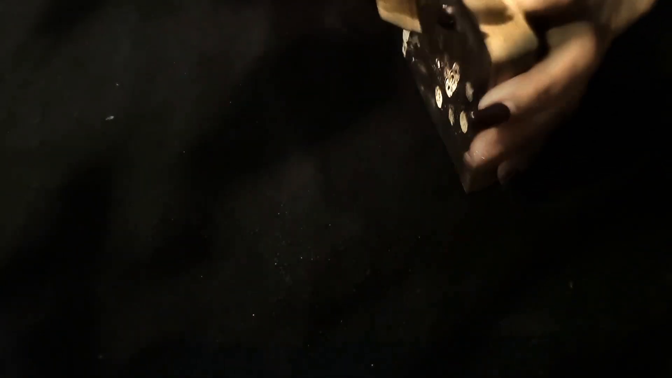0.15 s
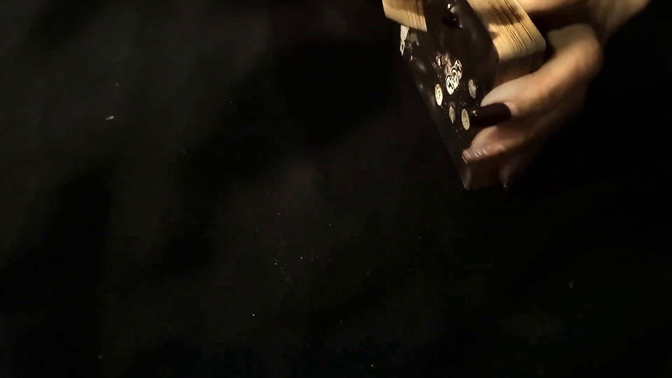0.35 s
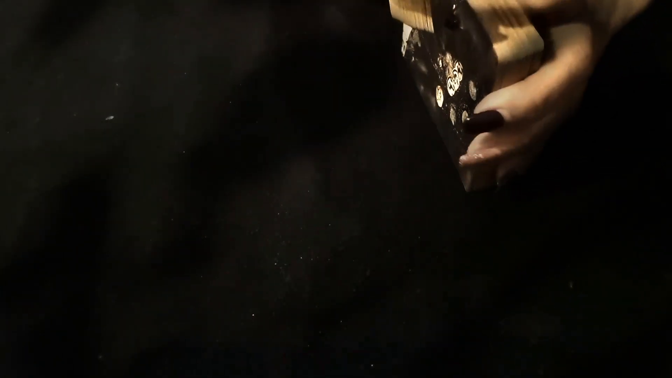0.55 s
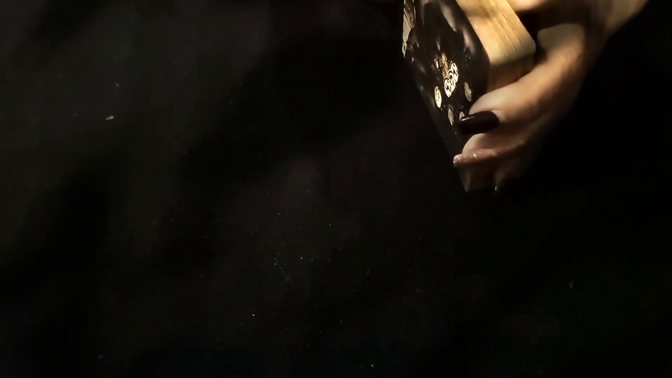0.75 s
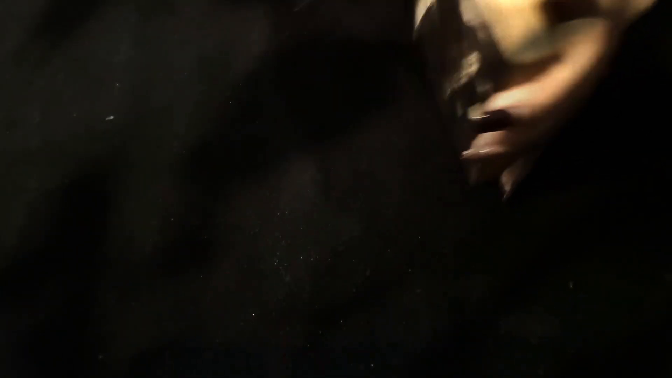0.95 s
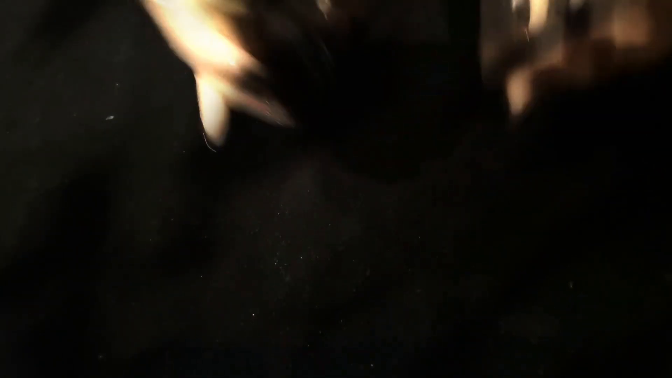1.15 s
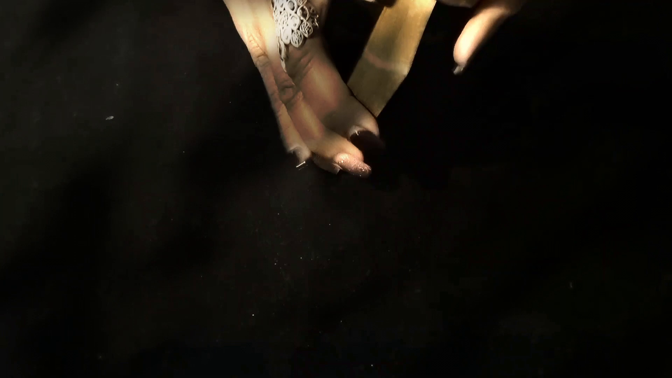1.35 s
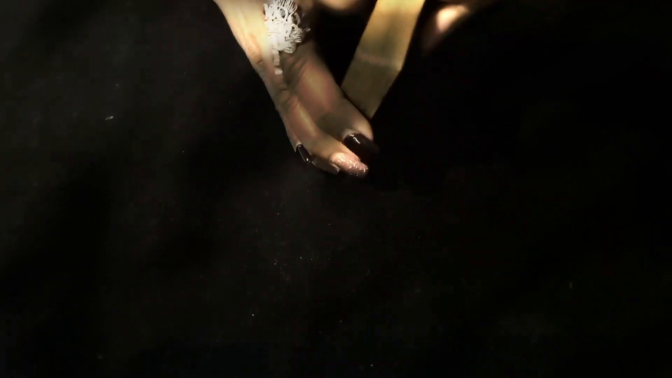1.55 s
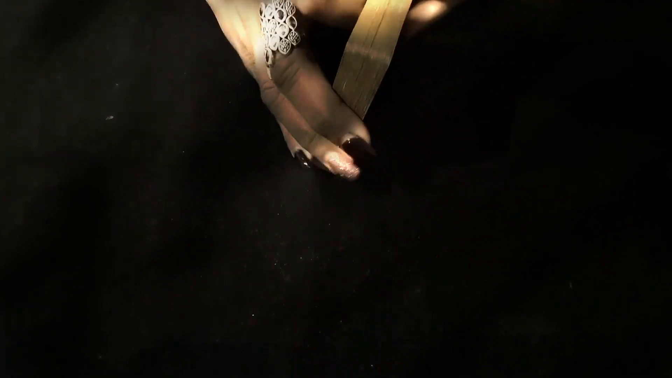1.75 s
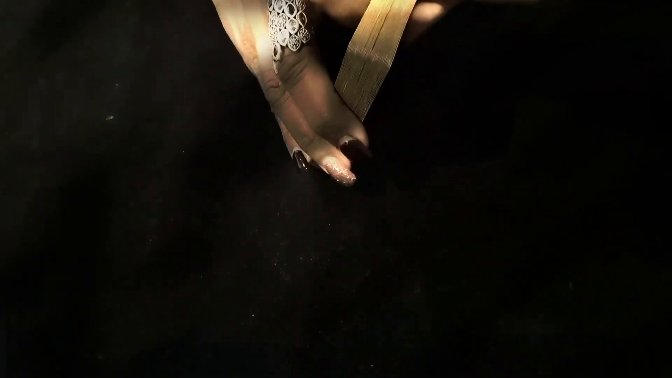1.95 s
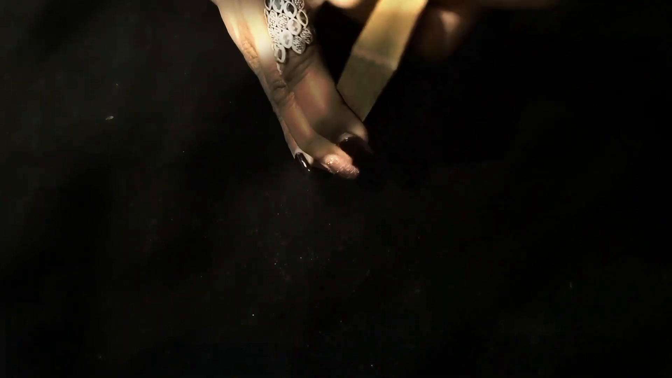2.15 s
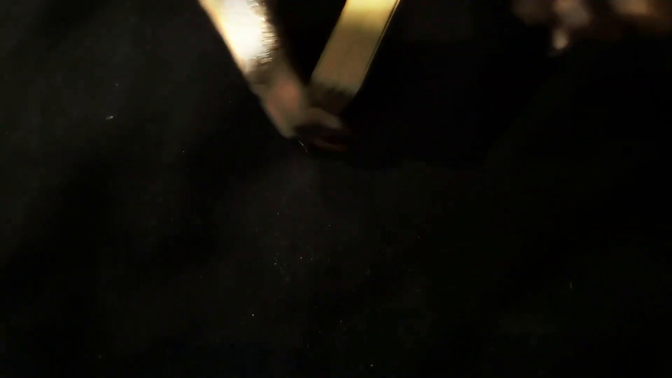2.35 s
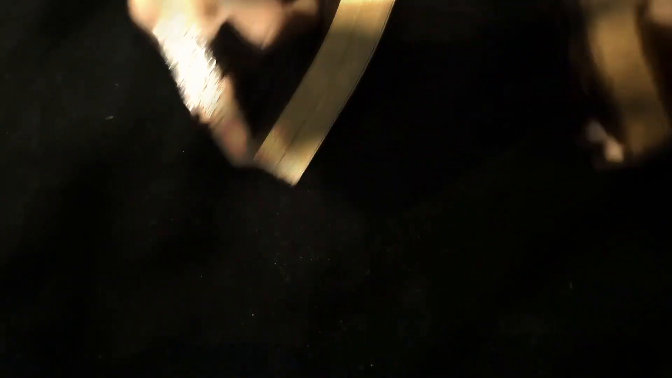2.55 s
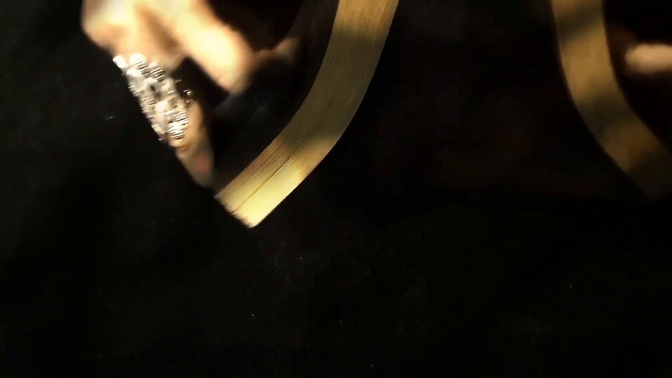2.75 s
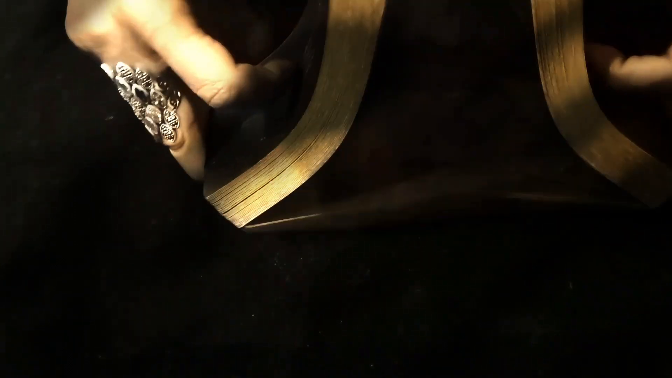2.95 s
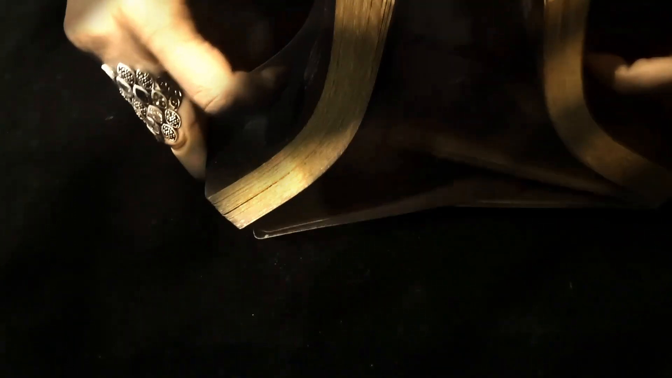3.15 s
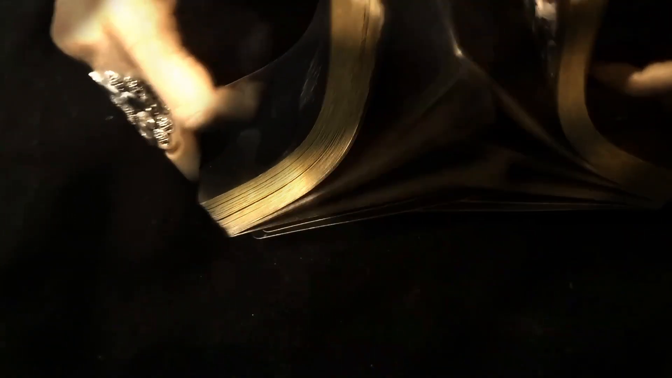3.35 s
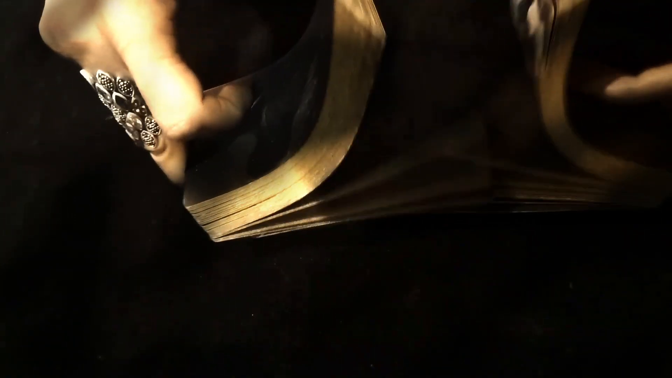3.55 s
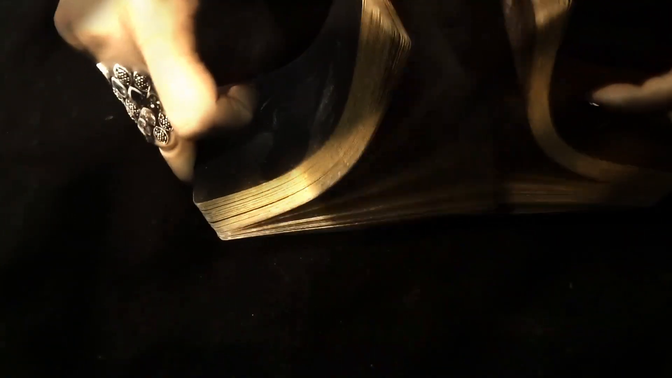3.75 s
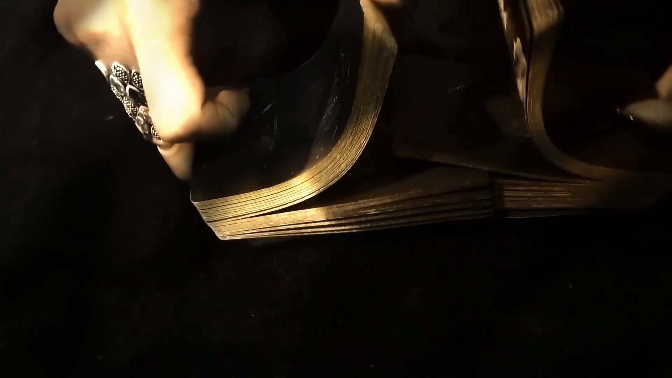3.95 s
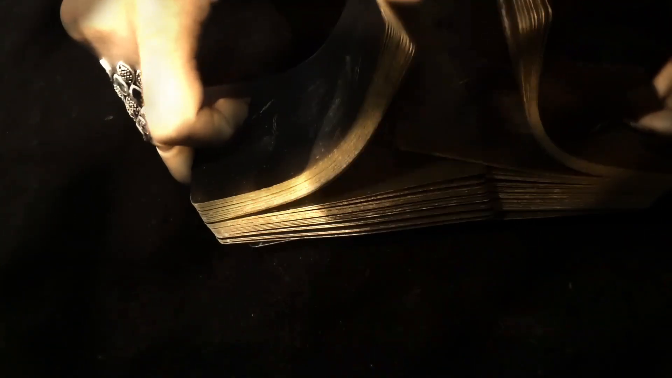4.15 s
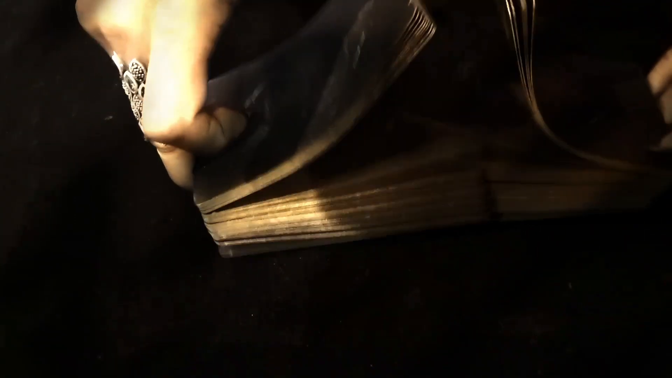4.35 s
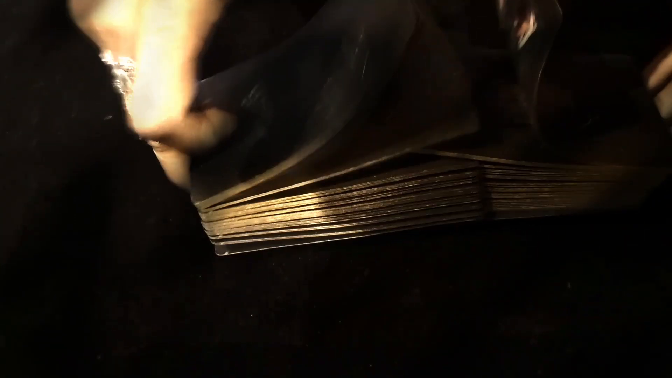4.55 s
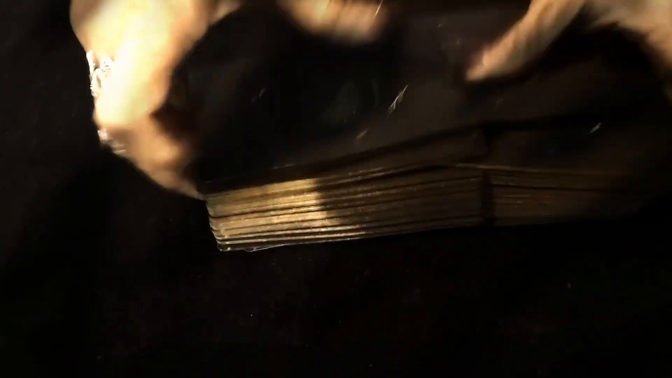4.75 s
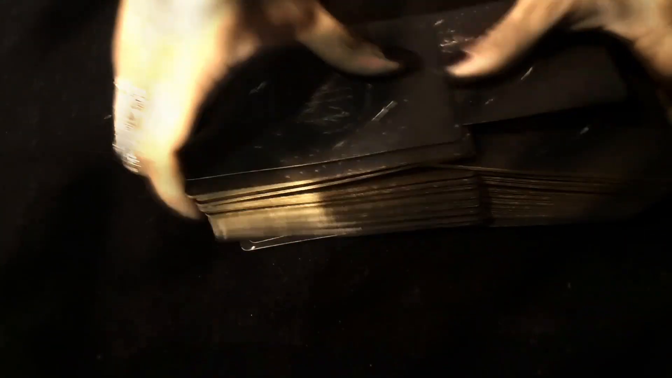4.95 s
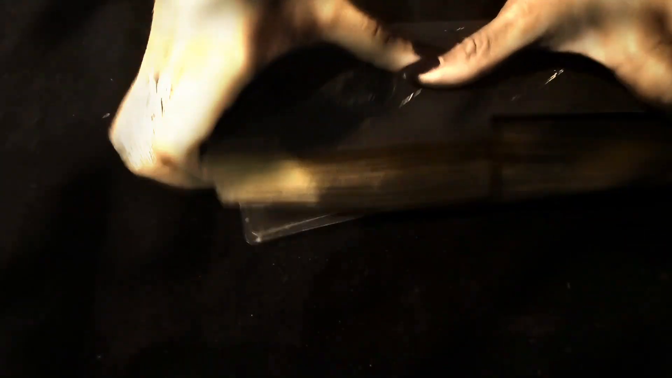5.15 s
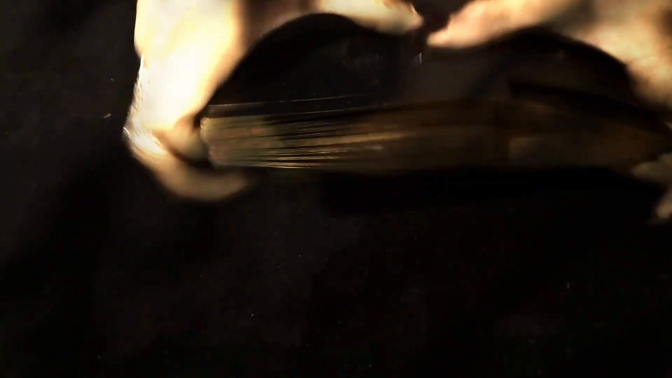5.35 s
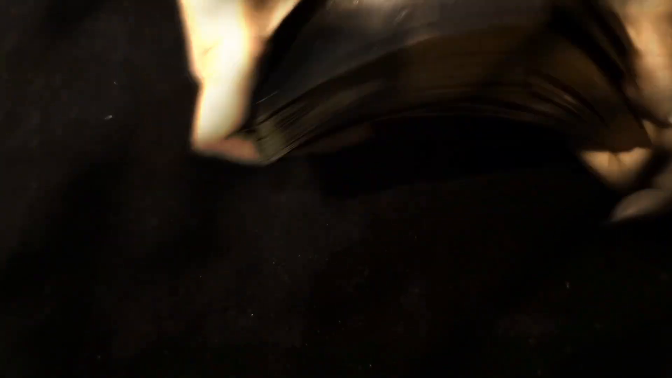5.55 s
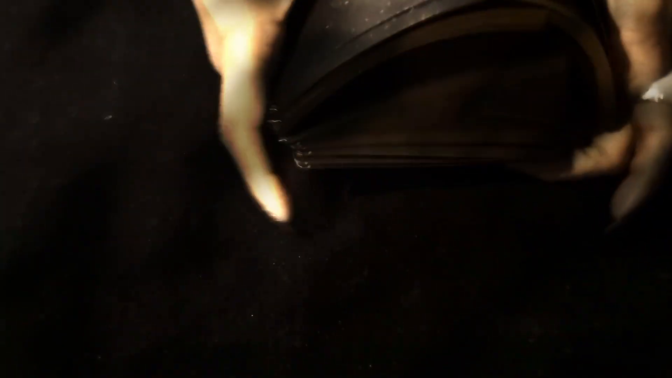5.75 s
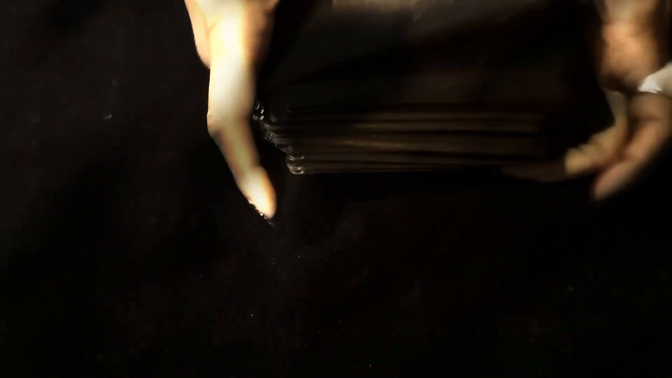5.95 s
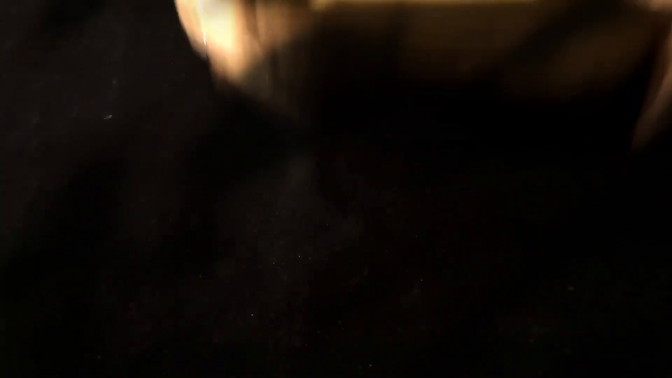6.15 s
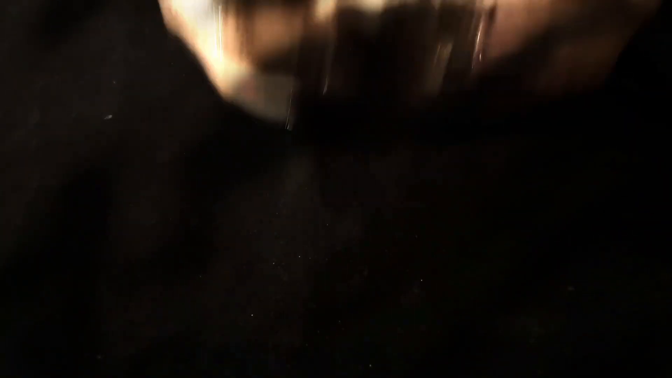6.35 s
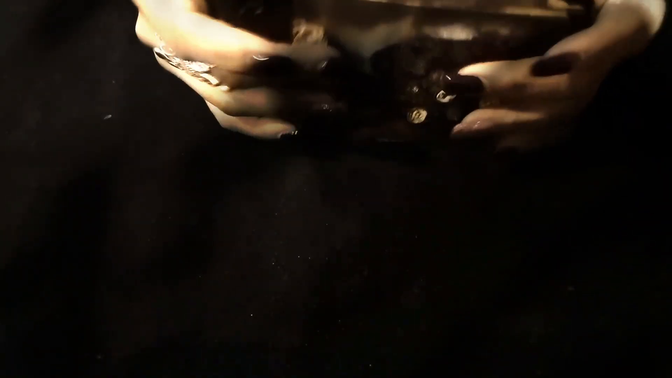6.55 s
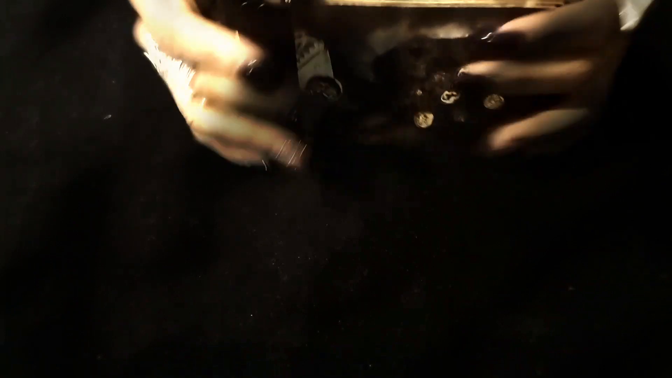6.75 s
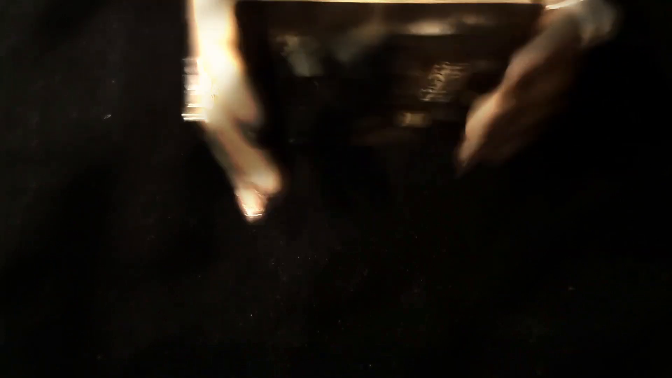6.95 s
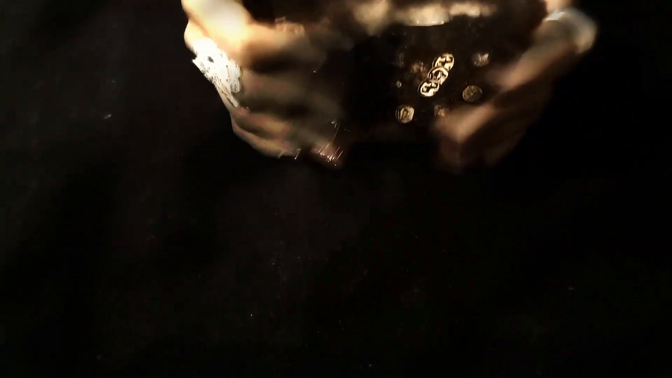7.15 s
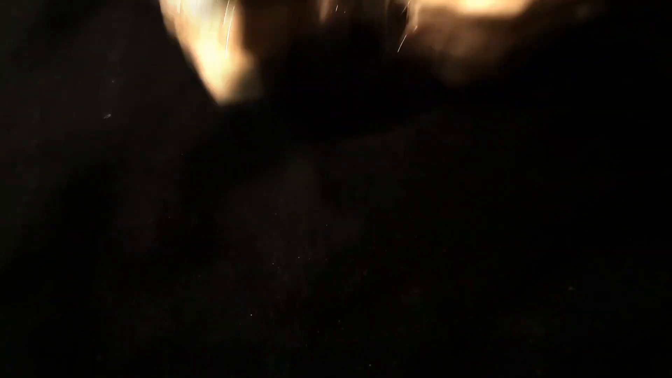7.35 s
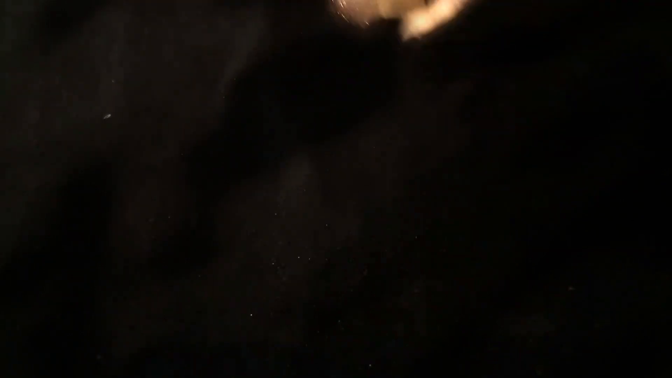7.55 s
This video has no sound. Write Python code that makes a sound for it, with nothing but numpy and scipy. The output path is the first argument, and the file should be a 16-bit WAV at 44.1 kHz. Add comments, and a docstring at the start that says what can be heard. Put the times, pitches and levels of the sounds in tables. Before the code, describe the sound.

A card deck knocks heavily on a cloth-covered table, then a quick uneven riffle snaps crisply, a short bridge cascade flutters, and squaring thumps follow.

```python
"""In a small quiet room, a deck of cards is knocked on a cloth-covered table, cut and riffled at close microphones.
Card contacts, most of them snaps in the riffle, are noise bursts and bending modes; buckled cards pop as gliding sines.
The halves slide together and a bridge cascades flat: noise with a stick-slip envelope, as are the scrapes of the edges.
Each knock, also when the deck is squared, is a soft pulse, a clatter of noise and the damped modes of the table.
Echoes with frequency-dependent decay surround the contacts, over a low steady hush."""
import sys
import numpy as np
from scipy import signal
from scipy.fft import rfft, irfft, next_fast_len
from scipy.io import wavfile
from scipy.ndimage import map_coordinates

SR = 44100
rng = np.random.default_rng(int(sys.argv[2]) if len(sys.argv) > 2 else 0)


def generate_wav(signal):
    """Clip the signal to [-1, 1] and save it as 16-bit WAV at the path in sys.argv[1]."""
    frames = np.transpose(np.atleast_2d(signal))
    scaled = np.clip(frames, -1, 1) * 32767
    pcm = np.round(scaled).astype(np.int16)
    wavfile.write(sys.argv[1], SR, pcm)


N = 334719

# Short card contacts: cards snapping on the pile, edges slipping off the thumb, small handling ticks.
# Each row: time in seconds, relative level of the card body in dB, relative level of the edge crack in dB,
# contact length in seconds.
FLICKS = [(1.776, -79, -67, .002), (2.4964, -47, -43, 0.0029), (2.9425, -60, -61.5, .0026),
          (3.0114, -52, -54.5, .006), (3.1215, -49, -52.5, 0.0019), (3.1591, -34, -41.5, .0018),
          (3.213, -35.5, -33, 0.0024), (3.2468, -44, -50, 0.00072), (3.331, -49, -48, .0015),
          (3.3494, -33, -44.5, .0015), (3.395, -26.5, -35.5, 0.00087), (3.4007, -24, -29, 0.0051),
          (3.4326, -19.5, -19, .002), (3.455, -16.5, -23, 0.0065), (3.4825, -32.5, -23.5, .0018),
          (3.5339, -18, -28.5, .0019), (3.5462, -31.5, -26, .0021), (3.569, -22, -25.5, 0.0018),
          (3.583, -25, -19, .0018), (3.663, -19, -20.5, 0.0043), (3.7668, -35.5, -37.5, 0.0013),
          (3.7774, -24.5, -26, 0.0011), (3.8948, -49, -48.5, .0027), (3.914, -35, -36, 0.0017),
          (3.965, -47, -47, 0.0015), (3.9769, -29, -33.5, .002), (3.9813, -24.5, -23.5, 0.0018),
          (4.0025, -18, -15.5, .0025), (4.0108, -16.5, -19.5, .0014), (4.0316, -28, -20.5, .0012),
          (4.042, -33.5, -29.5, .0013), (4.098, -35.5, -37.5, 0.0033), (4.113, -32, -30, .0037),
          (4.129, -22.5, -30, 0.0027), (4.1502, -19, -27.5, 0.001), (4.1543, -27, -23, .0012),
          (4.251, -40, -30.5, 0.0021), (4.2611, -30.5, -32, 0.0022), (4.2704, -27.5, -22.5, .0013),
          (4.285, -23.5, -20, .0015), (4.3693, -27, -25.5, 0.0037), (4.389, -24, -24, 0.001),
          (4.4855, -57, -43, .0016), (4.5262, -41.5, -39, 0.0018), (4.539, -30, -26, .0014),
          (4.6077, -35, -31, 0.0015), (4.622, -28, -26, 0.0025), (4.6733, -42, -44.5, 0.00062),
          (4.788, -37, -39, 0.0044), (4.8424, -34, -27, .0028), (4.857, -25.5, -38.5, .0015),
          (4.8694, -33.5, -32, .001), (4.8883, -20.5, -21.5, 0.0033), (4.9046, -28, -21.5, .0021),
          (4.9276, -29.5, -35, .0018), (4.9346, -30, -28.5, .0015), (4.9782, -33.5, -40.5, .0012),
          (4.9862, -38.5, -32, .0015), (5.0054, -52, -40, .0008), (5.2693, -55.5, -52.5, .0013),
          (5.3674, -60, -56.5, .0015), (5.5826, -55.5, -51.5, 0.0015), (5.854, -26.5, -28.5, .0029),
          (5.87, -19, -25, .0009), (5.878, -17.5, -19.5, 0.0014), (6.0563, -36.5, -29.5, .0022),
          (6.097, -26.5, -25.5, .0017), (6.1198, -18.5, -21.5, 0.0014), (6.1365, -22, -29.5, .001),
          (6.1468, -24.5, -22, .001), (6.157, -19.5, -31, .0013), (6.268, -53.5, -45.5, 0.0008),
          (6.2875, -44, -44, 0.0046)]
# Spectrum of a flexing card. Each row: frequency in Hz, relative density in dB per Hz.
BODY = [(400, -26.5), (900, -6.5), (1700, 1), (2800, -1.5), (3800, -4.5), (7000, -35.5)]
# Spectrum of a cracking or brushing card edge. Each row: frequency in Hz, relative density in dB per Hz.
CRACK = [(1500, -34), (3200, -6), (4800, 2.5), (6500, -1.5), (8100, 2), (9100, -6.5), (11000, -0.5),
         (13000, 2.5), (15000, -7), (16500, -24)]


def amp(db):
    """Level law: decibels to an amplitude ratio."""
    return 10 ** (np.asarray(db) / 20)


def unit(x):
    """Power normalisation: scale to rms 1."""
    return x / np.sqrt(np.mean(x ** 2) + 1e-20)


def along(points, hz):
    """Logarithmic frequency scale: interpolate (Hz, value) points along it."""
    f, v = np.transpose(points)
    return np.interp(np.log(hz + 1), np.log(f), v)


def coloured(x, points):
    """Spectral shaping: filter x by a magnitude curve, then scale to rms 1."""
    n = x.shape[-1]
    m = next_fast_len(n)
    gain = amp(along(points, np.fft.rfftfreq(m, 1 / SR)))
    return unit(irfft(rfft(x, m) * gain, m)[..., :n])


def pair(n, alike):
    """Interaural coherence: white noise at two microphones that share a part of its power."""
    left, right, common = rng.standard_normal((3, n))
    share = np.clip(alike, 0, 1)
    return np.sqrt(share) * common + np.sqrt(1 - share) * np.array([left, right])


def panned(db):
    """Intensity stereophony: left and right gains for a level difference, left over right."""
    return unit(amp([[db / 2], [-db / 2]]))


def add(track, s, x):
    """Superposition: mix x into the track from time s, cut at the track's ends."""
    i = round(s * SR)
    x = x[:, max(-i, 0):N - i]
    track[:, max(i, 0):max(i, 0) + x.shape[1]] += x


def contact_time():
    """Impact time scale: a short axis in seconds with the contact at zero, in its middle."""
    return np.arange(-1024, 1024) / SR


def burst(colour, rise, fall, alike):
    """Transient friction: coloured noise swells and dies exponentially, with rms 1 over five milliseconds."""
    t = contact_time()
    envelope = np.exp(-np.maximum(-t / rise, t / fall))
    x = coloured(pair(len(t), alike), colour) * envelope
    return x / np.sqrt(np.mean(np.sum(x ** 2, axis=1)) / (.005 * SR))


def swell(s, rise, fall):
    """Gaussian envelope: a smooth rise to a peak at time s, and a smooth fall."""
    t = np.arange(N) / SR - s
    return np.exp(-np.minimum(np.maximum(-t / rise, t / fall), 2 * np.pi) ** 2)


def room(x, wet_db, gap=0.0029, near_db=4, near_s=0.019, mono_hz=650):
    """Reverberation: decaying diffuse echoes; near walls answer first, and the bass arrives alike at both sides."""
    # Decay of the echoes, apart from the early boost. Each row: frequency in Hz, 60 dB decay time in seconds.
    decay_times = [(80, 0.7), (210, 0.31), (560, 0.26), (1470, 0.24), (3900, .24), (10000, 0.21),
                   (16000, 0.22)]
    hz, t, z = signal.stft(rng.standard_normal((2, SR // 2)), SR, nperseg=256)
    z[1] *= (hz / np.hypot(hz, mono_hz))[:, None]  # little side signal in the bass
    decay = amp(-60 * t / along(decay_times, hz)[:, None])
    mid, side = signal.istft(z * decay, SR, nperseg=256)[1]
    t = np.arange(len(mid)) / SR
    onset = np.clip(2 * t / gap - 1, 0, 1)
    near_walls = amp(near_db * np.exp(-t / near_s))
    tail = np.array([mid + side, mid - side]) * onset * near_walls
    tail *= amp(wet_db) / np.linalg.norm(tail[0])
    tail[:, 0] = 1  # direct sound
    return signal.fftconvolve(x, tail, axes=1)


def room_hush():
    """Stationary background noise: a low, steady hush, partly shared by the two sides."""
    # Spectrum of the hush. Each row: frequency in Hz, relative density in dB per Hz.
    hush_colour = [(20, -27), (45, -2), (80, -4.5), (115, -6), (250, -13), (400, -13.5), (600, -28.5),
                   (1000, -33), (2000, -38.5), (6000, -42.5), (12500, -37), (16000, -42.5)]
    return amp(-68.5) * coloured(pair(N, .7), hush_colour)


def friction(colour, alike, grain_db, rate, tick_db=-13, ticks_per_s=45):
    """Stick-slip: card faces catch and let go as noise of jumping strength, with stray ticks of their edges."""
    draws = rng.standard_normal(int(N * rate / SR) + 4)  # rate: draws per second
    catches = map_coordinates(draws, [np.arange(N) * rate / SR], order=1)
    rub = unit(pair(N, alike) * amp(grain_db * catches))
    ticks = pair(N, alike) * (rng.random(N) < ticks_per_s / SR)
    return coloured(rub + amp(tick_db) * unit(ticks), colour)


def sliding(flutter_db=-3):
    """Sliding friction: fingers brush the deck in strokes; interleaved cards flutter and hiss as they slide home."""
    # Packets and fingers sliding over card faces. Each row: time of the peak in seconds, rise in seconds,
    # fall in seconds, relative level of the hiss in dB, relative level of the rub in dB.
    strokes = [(.044, 0.022, .04, -61.5, -46.5), (.225, 0.02, 0.033, -58.5, -57),
               (.86, 0.036, .04, -67.5, -96.5), (1.024, .018, .08, -60.5, -77),
               (1.336, 0.11, .08, -78.5, -98.5), (1.785, 0.03, 0.22, -78.5, -81.5),
               (2.434, .08, 0.14, -70.5, -77.5), (3.03, 0.097, 0.12, -71.5, -63.5),
               (3.229, 0.014, .04, -51.5, -41.5), (4.301, 0.035, 0.03, -33, -42.5),
               (4.539, 0.057, 0.04, -60, -45), (4.801, .025, 0.018, -48.5, -39),
               (4.901, 0.036, 0.049, -45.5, -29.5), (5.18, 0.067, .08, -74, -70.5),
               (5.281, 0.039, 0.14, -60, -58), (5.542, .07, 0.11, -57.5, -58.5),
               (5.81, 0.094, .03, -59.5, -59.5), (6.37, 0.013, 0.039, -62, -61.5),
               (6.454, .025, .06, -53.5, -50.5), (6.611, .02, 0.032, -53, -55), (6.92, .09, 0.12, -63, -60),
               (7.174, 0.048, .02, -51, -50.5), (7.409, 0.0495, 0.164, -62.5, -67.5)]
    # Spectrum of fluttering cards. Each row: frequency in Hz, relative density in dB per Hz.
    flutter_colour = [(40, -17.5), (130, 0), (250, -5.5), (420, 1.5), (700, -1), (1000, -6), (1600, -4),
                      (2200, -6.5), (3300, -11), (6000, -34.5)]
    hiss, flutter = settling() + np.array(bridge())
    for s, rise, fall, brush_db, rub_db in strokes:
        stroke = swell(s, rise, fall)
        hiss = hiss + amp(brush_db) * stroke
        flutter = flutter + amp(rub_db) * stroke
    x = hiss * friction(CRACK, alike=0.042, grain_db=3.5, rate=520) * panned(2.4)
    x += amp(flutter_db) * flutter * friction(flutter_colour, alike=0.51, grain_db=5.0, rate=400) * panned(1.8)
    return room(x, wet_db=-14.0)[:, :N]


def ringing(modes):
    """Modal superposition: damped cosines that build up within a few milliseconds."""
    t = np.arange(SR) / SR
    build_up = 1 - np.exp(-t / .004)
    return build_up * sum(amp(db - 60 * t / t60) * np.cos(2 * np.pi * hz * t) for hz, db, t60 in modes)


def push(db, hz):
    """Cushioned impact: one blow softened by cloth, a smooth pulse with a trough on either side."""
    u = (np.pi * hz * contact_time()) ** 2
    return amp(db) * (1 - 2 * u) * np.exp(-u) * panned(.6)


def knocks(boom_hz=230, clatter_db=-1, top_db=-1):
    """Impact excitation: a corner lands, then the deck; cards clatter and slap, and slow blows boom the table most."""
    # Deck or packet meeting the table. Each row: time in seconds, level of the push in dB, pitch of the push
    # in Hz, then relative levels in dB of the clatter, the leading corner and the slap of card faces.
    blows = [(.0478, -10.5, 152, -26, -12.5, -42), (0.22, -13, 166.8, -33.5, -26, -52),
             (1.022, -.5, 242, -18, -37.5, -37.5), (1.473, -40.5, 195.5, -76.5, -66, -89),
             (1.506, -37, 240, -64.5, -56, -83), (1.523, -30.5, 208, -65, -40.5, -81),
             (2.128, -45, 234, -61, -76, -82), (2.801, -47.5, 203, -71, -68.5, -81),
             (3.012, -34.5, 284, -55, -51.5, -66), (3.16, -27, 382, -53, -56, -57),
             (3.35, -22.5, 418, -49.5, -50.5, -56), (4.929, -14.5, 435, -42, -34, -42.5),
             (5.286, -35, 300, -46, -53, -54), (5.667, -46.5, 155, -66, -60, -69),
             (5.779, -38, 397, -54, -60, -69), (5.87, -21.5, 355, -37, -46, -39),
             (5.885, -36, 79, -48, -52, -45), (6.036, -34, 139, -50, -52, -48.5),
             (6.107, -21, 335, -28.5, -33, -36.5), (6.135, -22.5, 400, -24, -28, -32.5),
             (6.158, -32, 328, -28.5, -41.5, -32.5), (6.607, -20, 350, -29, -28.5, -47.5),
             (6.621, -6, 240, -11.5, -9, -34.5), (6.633, -5.5, 520, -19.5, -24, -39.5),
             (7.151, -35, 302, -39.5, -41, -50), (7.1743, -26, 255, -31.5, -46, -43),
             (7.241, -27.5, 378, -42.5, -44, -56), (7.346, -43.5, 250, -59, -56, -82)]
    # Spectrum of the clatter. Each row: frequency in Hz, relative density in dB per Hz.
    clatter_colour = [(40, -38), (150, 0.5), (400, 1.5), (580, 1.5), (900, -4.5), (1130, -13.5),
                      (1600, -12.5), (2400, -27), (4300, -53.5), (9000, -63.5)]
    # Modes of the table and low modes of the room. Each row: frequency in Hz, relative level in dB,
    # 60 dB decay time in seconds.
    boom_modes = [(61.6, -13.5, 0.18), (75.5, -43.5, 0.5), (134.5, -9.5, 0.24), (151.3, -29, 0.52),
                  (276, -39, 0.39)]
    # Modes of the table top rung by hard edges. Each row: frequency in Hz, relative level in dB,
    # 60 dB decay time in seconds.
    top_modes = [(336, -16, 0.42), (404, -9, 0.27), (576, -10, .2), (634, -22.5, 0.27), (733, -23.5, .25),
                 (857, -20, 0.14), (945, -21.5, 0.19)]
    corner_lead_s, corner_hz = 0.0039, 480  # one corner touches down before the rest
    tick_db, tick_growth = -33, .65  # edge tick at a clatter of 0 dB; dB of tick per dB of clatter
    out, t = np.zeros((2, N)), contact_time()
    boom, top = ringing(boom_modes), ringing(top_modes)
    for s, db, hz, clatter, corner, slap in blows:
        cards = amp(clatter + clatter_db) * burst(clatter_colour, rise=0.0048, fall=0.0035, alike=0.54)
        cards += amp(slap) * burst(BODY, rise=0.0012, fall=0.0026, alike=0.19)
        cards += amp(tick_db + tick_growth * clatter) * burst(CRACK, rise=0.0022, fall=0.0024, alike=0.02)
        first = np.roll(push(corner, corner_hz), -round(corner_lead_s * SR), axis=1)
        add(out, s + t[0], room(first + push(db, hz), wet_db=-4.5))
        add(out, s + t[0], room(cards, wet_db=-2.5))
        slowness = 2 / (1 + (hz / boom_hz) ** 4)  # slow pulses drive the low modes most
        table = amp(db) * slowness * boom + amp(clatter + top_db) * top
        add(out, s, table * panned(.6))
    return out


def card_ring(hz, life):
    """Bending modes: three fast-dying sines, different for every contact, with rms 1 over five milliseconds."""
    t = np.maximum(contact_time(), 0)
    pitches = hz * np.exp(.5 * rng.standard_normal((3, 1)))
    x = np.sum(np.sin(2 * np.pi * pitches * t), axis=0) * np.exp(-t / life)
    return x / np.sqrt(np.sum(x ** 2) / (.005 * SR))


def card(body, crack, length, pan, body_db=-3.5, ring_db=-4, crack_db=-1.0):
    """Contact duration: a puff of air, a flexing body and an edge crack, which clicks more the shorter the contact."""
    # Spectrum of the puff of air. Each row: frequency in Hz, relative density in dB per Hz.
    puff_colour = [(30, -16), (60, 0.5), (130, -4.5), (400, -5), (850, -4.5), (1300, -13), (3000, -53.5)]
    firm_db = -25  # body level of a firm contact
    puff_db, puff_growth = -31, 0.6  # puff of a firm contact; dB of puff per dB of body
    click_db, click_length_s = -6, 0.0012  # click over the crack entry, at this contact length
    rise = .7 * length
    x = amp(body + body_db) * burst(BODY, rise=rise, fall=2.3 * length, alike=0.057)
    x += amp(body + ring_db) * card_ring(hz=1717, life=0.0039)
    x += amp(crack + crack_db) * burst(CRACK, rise=rise, fall=0.89 * length, alike=0.28)
    click = burst(CRACK, rise=.00015, fall=.0005, alike=.5)
    click *= amp(crack + click_db) * (click_length_s / length) ** 2
    puff = burst(puff_colour, rise=rise, fall=0.0018, alike=0.73)
    puff *= amp(puff_db + puff_growth * (body - firm_db))
    return x * panned(pan) + click + puff


def card_contacts():
    """Release and impact: a soft scrape leads each short contact, be it a snap, a slip off the thumb or a tick."""
    pan_db, pan_spread_db = 4.5, 3  # left over right
    lead_s, scrape_db, scrape_spread_db = 0.012, -16.5, 8.5  # scrape ahead of contact; level over crack entry
    out, t = np.zeros((2, N)), contact_time()
    for s, body, crack, length in FLICKS:
        side, early, grip = rng.standard_normal(3)
        contact = card(body, crack, length, pan_db + pan_spread_db * side)
        scrape = burst(CRACK, rise=.0012, fall=0.00067, alike=.1)
        scrape *= amp(crack + scrape_db + scrape_spread_db * grip)
        lead = round(lead_s * np.exp(0.071 * early) * SR)
        add(out, s + t[0], room(contact + np.roll(scrape, -lead, axis=1), wet_db=-5.5))
    return out


def settling():
    """Frictional braking: strength of the brief hiss and rub that swell and die after each card contact."""
    peak_s, hiss_db, rub_db = 0.012, -30.5, -12.5  # peak after contact; relative to crack and body
    out, u = np.zeros((2, N)), np.arange(SR // 4) / SR / peak_s
    for s, body, crack, _ in FLICKS:
        add(out, s, amp([[crack + hiss_db], [body + rub_db]]) * u * np.exp(-u))
    return out


def pops(width=0.0013, glide=70):
    """Snap-through buckling: a bent card swings through a few cycles, rising in pitch as it flattens."""
    # Bent cards springing straight. Each row: time in seconds, level in dB, pitch at the centre in Hz,
    # left over right in dB.
    springs = [(3.4031, -19.5, 1480, -6), (3.4337, -15.5, 1580, 0), (3.5361, -6.5, 2099, 14),
               (3.5867, -7.5, 2137, 7.5), (3.6649, -8, 1960, 5.5), (4.8589, -11, 2033, 6)]
    out, t = np.zeros((2, N)), contact_time()
    for s, db, hz, pan in springs:
        phase = 2 * np.pi * hz * (t + glide * t ** 2 / 2)  # glide: relative rise per second
        swing = np.sin(phase) * np.exp(-(t / width) ** 2 / 2)
        add(out, s + t[0], room(amp(db) * swing * panned(pan), wet_db=-4.5))
    return out


def bridge():
    """Elastic release: strength of hiss and flutter as arched cards spring loose, stream down and come to rest."""
    start_s, end_s, attack_s, release_s = 5.84, 6.16, 0.024, .02
    hiss_db, flutter_db, growth_db_per_s = -36, -41, 24.5  # flutter grows as the arch collapses
    t = np.arange(N) / SR
    before, after = np.maximum(start_s - t, 0), np.maximum(t - end_s, 0)
    flow = np.exp(-before / attack_s - after / release_s)
    elapsed = np.clip(t, start_s, end_s) - start_s
    return flow * amp(hiss_db), flow * amp(flutter_db + growth_db_per_s * elapsed)


def scraping():
    """Rough-edge friction: card edges rub past each other, rough and nasal, as the deck is evened up."""
    # Card edges scraping. Each row: time of the peak in seconds, level in dB.
    scrapes = [(6.374, -59.5), (6.454, -55.5), (6.521, -62.5)]
    # Spectrum of the scrape. Each row: frequency in Hz, relative density in dB per Hz.
    scrape_colour = [(900, -17), (1700, -6.5), (2200, 2), (2800, -4.5), (5000, -20.5)]
    strength = sum(amp(db) * swell(s, rise=0.016, fall=0.026) for s, db in scrapes)
    rub = friction(scrape_colour, alike=.3, grain_db=8, rate=320)
    return room(strength * rub, wet_db=-7.5)[:, :N]


def scene():
    """Superposition: the cards over the low hush of the room."""
    return room_hush() + sliding() + knocks() + card_contacts() + pops() + scraping()


def record(dry, low_hz=42, top_hz=16300):
    """Band limiting and saturation: the lowest rumble is shed, peaks are rounded and the highest treble is cut."""
    m = next_fast_len(N + SR // 2)
    hz = np.fft.rfftfreq(m, 1 / SR)
    u = 1j * hz / low_hz
    high_pass = u ** 2 / (u ** 2 + np.sqrt(2) * u + 1)  # second-order Butterworth
    x = irfft(rfft(dry, m) * high_pass, m)
    x = x / (1 + np.abs(x / .98) ** 12) ** (1 / 12)
    return irfft(rfft(x) * (hz < top_hz), m)[:, :N]


dry = scene()
out = record(dry)
generate_wav(out)
```